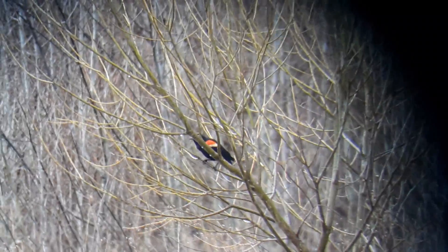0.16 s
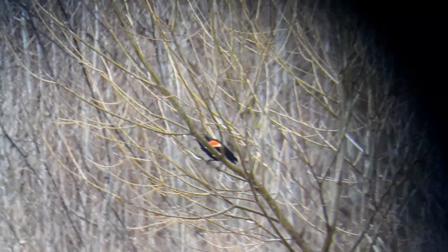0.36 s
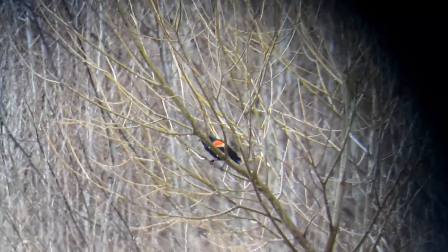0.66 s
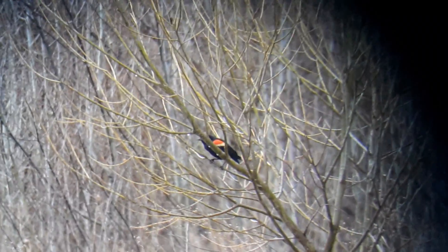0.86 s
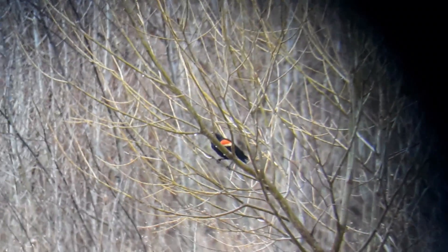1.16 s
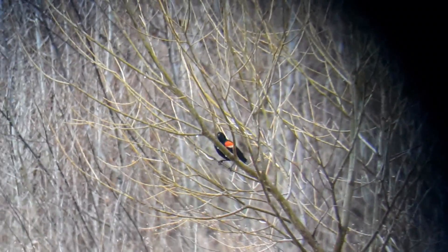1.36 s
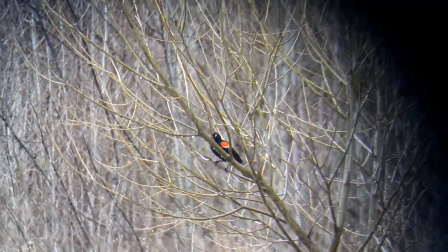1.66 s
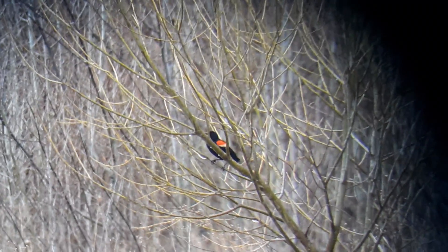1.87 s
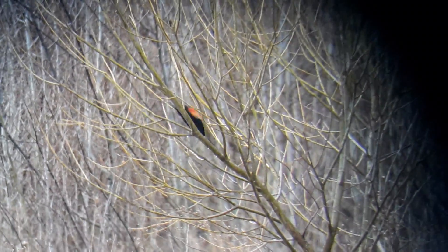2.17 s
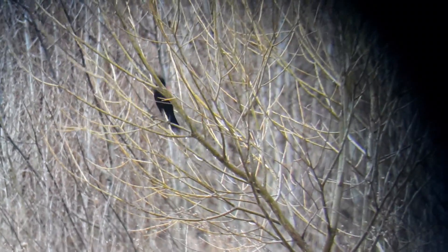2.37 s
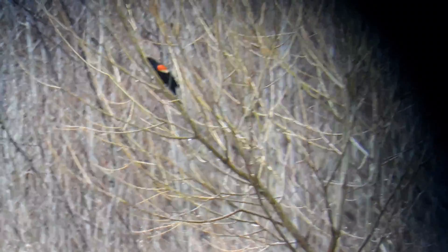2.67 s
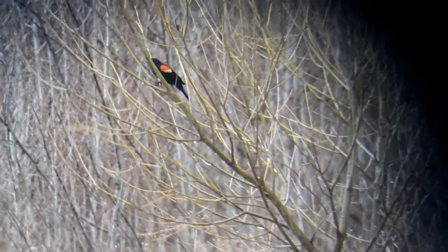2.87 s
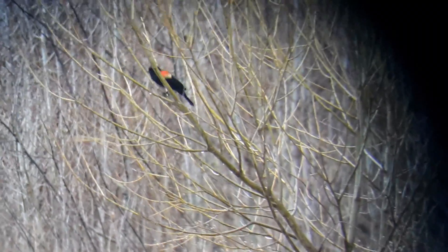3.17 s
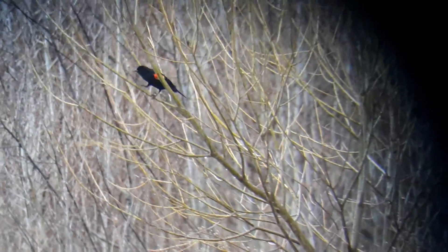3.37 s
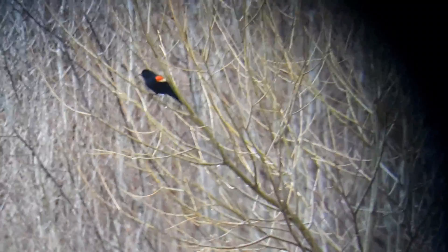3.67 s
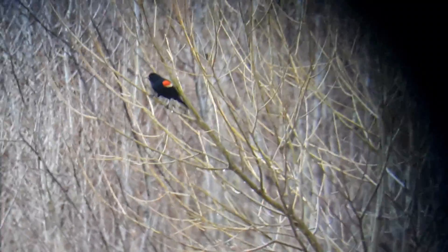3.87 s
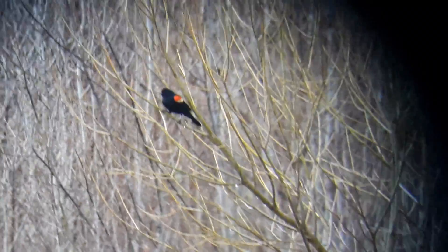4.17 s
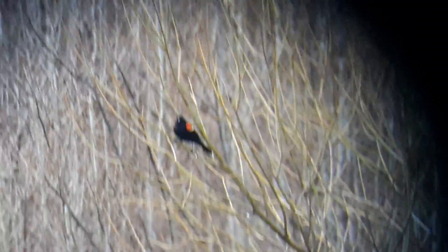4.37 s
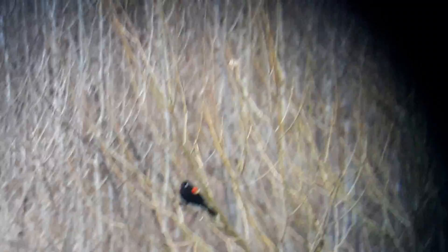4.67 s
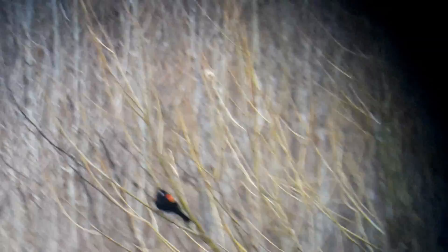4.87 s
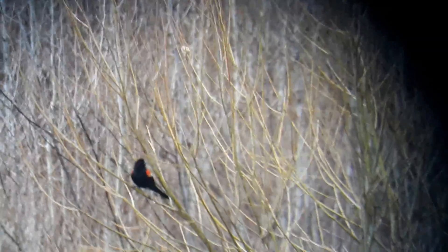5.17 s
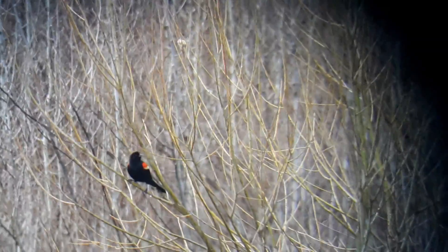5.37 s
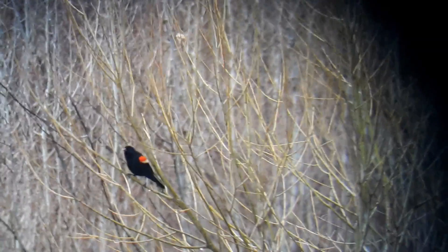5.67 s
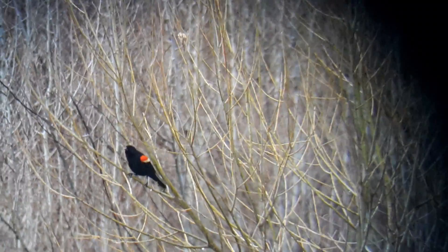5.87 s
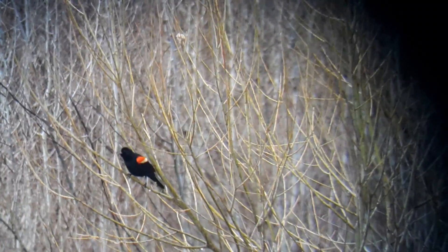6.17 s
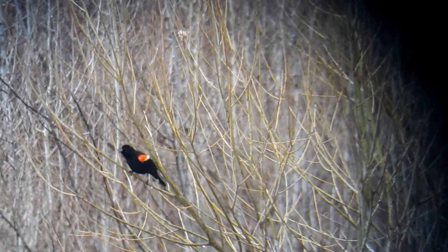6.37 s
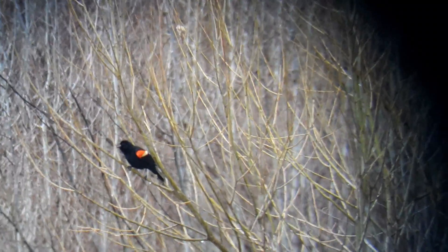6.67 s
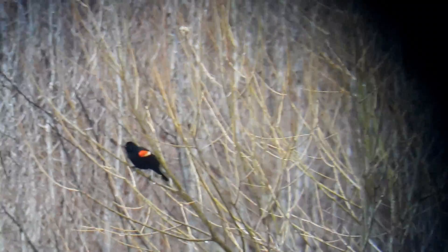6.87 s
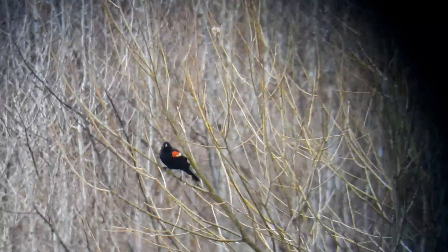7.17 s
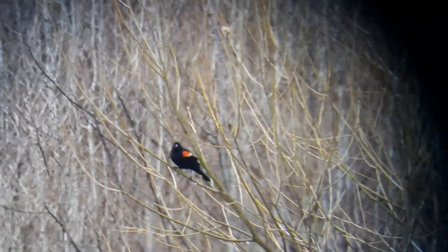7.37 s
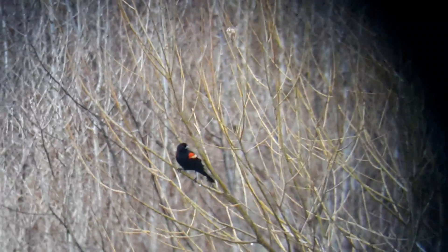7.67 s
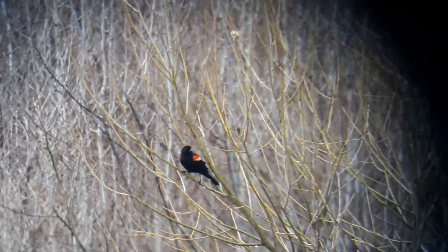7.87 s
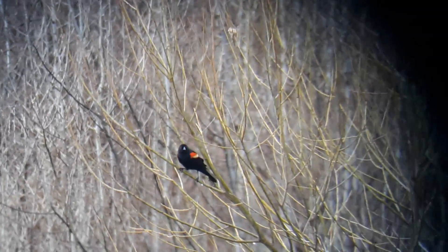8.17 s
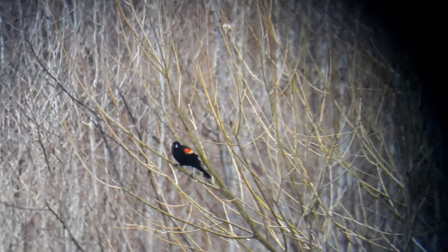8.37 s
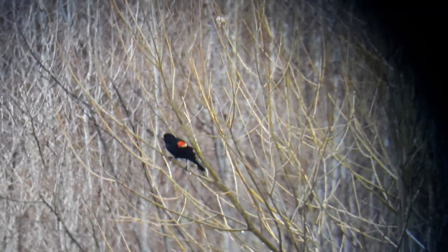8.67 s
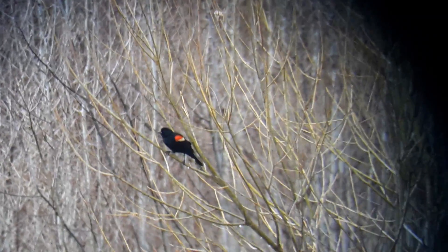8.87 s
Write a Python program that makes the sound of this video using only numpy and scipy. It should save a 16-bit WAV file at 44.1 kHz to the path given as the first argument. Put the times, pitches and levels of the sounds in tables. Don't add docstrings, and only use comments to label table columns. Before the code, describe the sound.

A continuous shrill whine of many peeping frogs, wavering slightly, fills the whole nine seconds over faint low traffic and hiss. At 0.2-0.7 s swallows twitter rapidly, with a small chack; at 0.85 s a sparrow whirrs, then ticks about every 0.13 s until 1.75. Faint whistles, a chack and reedy notes come around 1.7-2.6, then a weak fast trill to 3.1. Twitters and a sharp double chack at 3-3.2 lead to thin piping and single chacks. A strong dull knock lands at 3.67. From 4.2 to 5.05 a blackbird on the right sings: short burr, buzz, then slow harsh trill, with a bump at 4.48. Twitters at 5.2, knock at 5.45. Sparrow ticks return at 6.1-6.75 alongside clear whistles at 6.3-6.5; a faint distant trill and several rattly bumps near 6.9. At 7.45 a sharp whistle starts a quick trill until 8.0. Thin pipes and a weak chuck close.

```python
import sys
import numpy as np
from scipy import signal
from scipy.fft import rfft, irfft
from scipy.io import wavfile
from scipy.ndimage import uniform_filter1d

SR = 44100
rng = np.random.default_rng(int(sys.argv[2]) if len(sys.argv) > 2 else 0)


def output_pcm(signal):
    pcm = np.clip(np.atleast_2d(signal).T, -1, 1) * 32767
    wavfile.write(sys.argv[1], SR, np.round(pcm).astype(np.int16))


def gain_from_decibels(decibels):
    exponent = np.asarray(decibels, float) / 20
    return 10 ** exponent


N = 397341

# time in seconds, level in dB.
FROG_LEVEL = [(0.0, -49), (0.2, -52), (1.93, -50), (2.31, -54), (2.43, -48), (2.81, -52.5), (4.99, -48.5),
              (5.37, -51.5), (7.93, -49), (8.63, -52.5), (9.01, -50)]
# time in seconds, level in dB.
FAR_SONG_LEVEL = [(0, -66.5), (.4, -74.5), (.85, -77.5), (1.1, -83), (1.9, -81.5), (2.4, -78), (2.7, -72),
                  (3.15, -71.5), (4.2, -75.5), (4.6, -62.5), (5.05, -65), (5.4, -74.5), (6.3, -76.5),
                  (6.7, -63.5), (7.35, -80), (7.6, -67.5), (8.05, -68.5), (9.01, -82)]
# time in seconds, gain in dB.
CAMERA_GAIN = [(0, 2.5), (4.29, 0.5), (4.89, 4.5), (5.87, -0.5), (6.95, 6), (7.4, 2.5), (7.98, 4),
               (8.21, 0.5), (9.01, 1)]
# frequency in Hz, level in dB per Hz.
TRAFFIC_SPECTRUM = [(12, -28.5), (28, -22.5), (52, -8.5), (91, -1), (157, -7), (204, -13), (672, -19.5),
                    (1110, -28), (1770, -32), (2080, -39.5), (2500, -16), (3250, -38.5), (5500, -120)]
SONG_HAZE_SPECTRUM = [(1910, -1.5), (3250, 9.5), (3880, 1), (4180, 1), (4330, -2), (4680, -4.5), (4880, -3),
                      (5090, 3), (5230, -4.5), (5960, -24.5), (6980, -18), (7420, -56.5), (8000, -56.5),
                      (10400, -50.5), (17600, -120)]
HISS_SPECTRUM = [(3530, -38), (6000, -8.5), (6290, -10), (6890, -16.5), (8920, -11), (10700, -1),
                 (14000, 2), (15500, -1.5)]
# frequency in Hz, left minus right in dB.
SHADE = [(60, -1), (110, -1.0), (200, 0.0), (380, -3.5), (700, -2.5), (1290, -2), (2380, -1.5), (4400, -13),
         (8120, 1), (15000, 0)]
# frequency in Hz, likeness from 0 to 1.
LIKENESS = [(30, .4), (60, .8), (130, 0.6), (290, 0.42), (640, .3), (1410, .3), (3100, .3), (6820, 0)]

# start in seconds, length in seconds, centre in Hz, pitch swing in Hz, level in dB.
PURRS = [
    (.05, 0.78975, 5110, 109.5, -78),
    (6.05, 0.67, 5189, 117, -77.5),
    (8.05, 0.61, 4909, 180, -75),
]
RATTLES = [(1.91, 0.075, 4057, 301, -71.5), (4.44, 0.6915, 6607, 200.9, -79.5),
           (4.52, 0.5195, 3662, 346.7, -60.5), (4.5, 0.602, 2375, 119, -69), (6.62, 0.3653, 4624, 309, -74),
           (7.44, 0.04787, 2200, 300, -56.5), (7.472, 0.0565, 4926, 180, -58.5),
           (7.48, .05, 4050, 200.3, -66), (7.5, 0.4485, 6581, 299.2, -88.5),
           (7.53, 0.4826, 2314, 152.1, -71)]
HUSKS = [
    (2.61, .5, 4952, 131, -72.5),
    (2.61, .61, 3729, 300, -70),
    (7.52, .485, 3651, 305.7, -58),
    (7.54, .45, 5021, 199.5, -69.5),
]
BUZZES = [
    (4.285, 0.148, 5055, 160, -49.5),
    (4.3, 0.13, 4200, 200, -61),
    (4.295, 0.15, 3400, 120, -58),
    (4.3, .13, 6720, 150, -76),
]
BURRS = [
    (4.285, 0.17866, 1515, 52, -68.5),
    (4.196, 0.05576, 2210, 165, -45.5),
    (4.2, 0.07132, 6700, 280, -76),
]
WHIRR = [
    (.84, 0.08794, 6740, 403.1, -56.5),
]

# start in seconds, length in seconds, foot in Hz, top in Hz, level in dB.
TWITTERS = [(.178, 0.0125, 4791, 5298, -63.5), (0.197, 0.01377, 4788, 5257, -56.5),
            (.216, 0.01491, 4612, 5847, -62), (0.234, 0.01716, 4479, 5360, -60.5),
            (0.251, 0.01704, 4364, 5866, -57.5), (0.276, 0.00712, 4697, 5275, -64),
            (0.286, 0.008095, 4898, 5285, -65.5), (.296, 0.00806, 4803, 5411, -63),
            (0.583, 0.0204, 4316, 5722, -63), (0.608, 0.01513, 4393, 5804, -60),
            (0.627, 0.02025, 4494, 5689, -67), (0.646, 0.01656, 3907, 5624, -55.5),
            (.67, 0.01539, 4703, 5210, -66), (0.687, 0.01788, 4525, 5100, -59.5),
            (0.725, 0.00775, 4474, 5383, -66.5), (2.939, 0.01657, 4239, 5401, -62),
            (2.961, 0.00964, 4314, 5189, -58.5), (2.987, 0.01236, 4642, 5317, -61),
            (3.002, 0.0129, 4506, 5254, -60), (3.027, 0.01214, 4632, 5344, -63),
            (3.05, 0.01114, 4760, 5344, -68.5), (5.209, .013, 4421, 5863, -58),
            (5.225, 0.02, 4383, 5610, -58.5), (5.238, 0.019305, 3992, 5425, -54),
            (5.261, 0.01752, 4531, 5264, -62), (5.289, 0.00889, 4715, 5510, -63),
            (5.305, 0.01559, 4613, 5499, -67), (5.328, 0.01007, 4940, 5278, -70.5),
            (5.667, 0.01314, 4900, 5401, -73), (5.679, .017, 4500, 5392, -64.5),
            (5.707, 0.01453, 4606, 5298, -65.5), (5.724, 0.0169, 4691, 5100, -68.5)]
# start in seconds, length in seconds, foot in Hz, top in Hz, level in dB.
ARCHES = [
    (0.308, 0.03486, 4388, 4672, -64),
    (3.185, 0.031, 1104, 1573, -73.5),
    (3.191, .025, 4237, 4989, -57.5),
    (7.456, 0.01673, 6304, 6592, -74),
]
COO = (3.84, .21, 1165, 1222, -69)
# start in seconds, peak level in dB, upper edge of the throat band in Hz.
CHACKS = [(0.3197, -52.5, 5000), (2.357, -58.5, 3800), (3.191, -51.5, 4723), (3.2, -53, 4843),
          (3.194, -66.5, 6500), (3.21, -57, 4000), (3.64, -57, 3890), (3.8813, -56, 3820),
          (4.06, -57, 3800), (4.4087, -59.5, 6791), (5.64, -55, 4000), (5.9923, -72, 3660),
          (6.485, -58.5, 3800)]
# start in seconds, length in seconds, start in Hz, end in Hz, level in dB.
SEEPS = [(0.569, 0.01517, 5531, 6128, -75.5), (2.005, 0.1009, 6596, 5664, -77),
         (2.15, 0.06963, 6585, 5471, -81), (2.188, 0.1121, 5734, 5398, -79.5),
         (2.861, 0.02705, 5946, 5628, -74.5), (4.27, 0.3163, 7459, 7692, -85),
         (4.694, .11, 7511, 7435, -82.5), (8.207, 0.0399, 6989, 6900, -84.5),
         (8.566, 0.0278, 6800, 7170, -90.5), (8.882, 0.05456, 7078, 7175, -88)]
WHISTLES = [(1.715, 0.1199, 1930, 1982, -71.5), (1.813, 0.0464, 1811, 1972, -71.5),
            (3.146, 0.06524, 1470, 1560, -71), (5.913, 0.0541, 2260, 2312, -65.5),
            (3.229, 0.15004, 4890, 5100, -74), (2.47, 0.0037, 5584, 3750, -64.5),
            (3.443, 0.039, 4460, 4440, -74.5), (3.489, 0.034, 4810, 5050, -72.5),
            (6.492, 0.05376, 5851, 5798, -77.5), (7.272, 0.1066, 6191, 6342, -73.5),
            (4.488, 0.02334, 3334, 3524, -57), (6.298, 0.01738, 1193, 1106, -65.5),
            (6.3, 0.0741, 2384, 2446, -48.5), (6.305, 0.065, 2191, 2171, -56),
            (6.393, 0.14637, 2077, 2155, -54), (6.523, 0.01998, 2373, 1987, -54),
            (6.399, 0.0694, 6395, 6232, -82.5), (2.683, .03, 1418, 1448, -73.5),
            (6.539, 0.03309, 1554, 1220, -60.5), (6.604, 0.00487, 5546, 3830, -55),
            (6.617, 0.02637, 4884, 5410, -68), (6.889, 0.00598, 2331, 1300, -56),
            (7.42, 0.03693, 1160, 1148, -82), (7.453, 0.02132, 2426, 2101, -45),
            (7.66, 0.07587, 1467, 1628, -65), (8.006, 0.02818, 4973, 5125, -64)]
# start in seconds, peak level in dB.
TICKS = [(0.961, -47.5), (1.0865, -53.5), (1.2157, -53.5), (1.3409, -54.5), (1.473, -54.5), (1.6067, -53.5),
         (1.741, -55.5), (6.0891, -68), (6.213, -58), (6.3455, -56.5), (6.4844, -57.5), (6.6184, -58),
         (6.759, -69)]
# start in seconds, second overtone in dB, third overtone in dB.
CHUCKS = [
    (2.349, -71, -75),
    (4.05, -64, -74),
    (6.473, -60.5, -74.5),
    (8.705, -69.5, -80),
]
# start in seconds, length in seconds, start in Hz, end in Hz.
REEDY = [(2.484, 0.11772, 1641, 1705), (2.495, 0.0816, 1168, 1219), (4.451, 0.02189, 1985, 1802),
         (7.18, 0.0824, 1460, 1660), (7.258, 0.10782, 1656, 1696), (7.48, 0.02711, 2431, 2537)]
# first, second, third and fourth partial in dB.
REEDY_PARTIALS = [(-88, -59.5, -69.5, -98.5), (-85.5, -84, -68, -73.5), (-54, -83, -70, -93.5),
                  (-54, -80.5, -91.5, -87), (-68.5, -64, -61.5, -66), (-48, -59.5, -95.5, -99)]
# start in seconds, start in Hz, end in Hz, level in dB.
LOW_PIPER = [(3.275, 4454, 4360, -69.5), (3.664, 4492, 4383, -62.5), (4.085, 4571, 4345, -60),
             (8.09, 4584, 4494, -68.5), (8.455, 4530, 4388, -66), (8.758, 4355, 4407, -64)]
HIGH_PIPER = [(3.769, 4620, 4600, -63), (4.143, 4630, 4600, -60), (8.53, 4680, 4590, -71),
              (8.95, 4540, 4600, -65)]

# time in seconds, pulses a second, level in dB.
FAINT_TRILL = [(2.61, 174, -72), (2.7, 170.5, -70), (2.85, 166.5, -70), (3.11, 162.5, -71)]
NEAR_TRILL = [(4.49, 52.5, -53), (4.65, 50, -51.5), (4.74, 48, -50.5), (4.85, 47.2, -50.5),
              (4.93, 49.2, -51), (5.06, 48, -56)]
FAR_TRILL = [(6.59, 50.5, -72), (6.75, 48.8, -69), (6.86, 47.5, -67), (6.95, 48.6, -67), (7.108, 48.8, -68),
             (7.12, 49, -80)]
QUICK_TRILL = [(7.528, 91, -63), (7.68, 91.3, -61), (7.87, 88.8, -60), (7.997, 85, -61)]
# place in the pulse from 0 to 1, pitch in Hz, level in dB.
FAINT_LOW = [(.2, 3590, 2.5), (.7, 4005, -5.5)]
FAINT_HIGH = [(0, 4950, 10), (.5, 4756, -1.5)]
NEAR_PULSE = [(0, 5650, 12), (.08, 4820, 18.5), (.14, 3550, 6), (.21, 4900, 14), (.3, 5150, 9),
              (.4, 4950, 7.5), (.55, 4200, 4), (.72, 3850, 4), (.87, 4550, 8), (.94, 5100, 14)]
FAR_PULSE = [(0, 3458, 16.71), (.15, 3380, 9), (.3, 4200, 2), (.5, 4969, 3.7), (.7, 4400, 3),
             (.85, 3515, 5.7)]
QUICK_LOW = [(0, 3700, 10), (.1, 4050, 13), (.25, 3850, 11), (.4, 3300, 5), (.55, 4300, 11),
             (.65, 3850, 17.5), (.75, 3250, 12), (.88, 3300, 10)]
QUICK_HIGH = [(0, 5050, 10), (.25, 4500, 1), (.5, 5050, 6), (.73, 4400, 0)]

# start in seconds, peak level in dB, time to ring down 60 dB in seconds, brightness in dB.
BUMPS = [(3.118, -43.5, 0.0634, -23.5), (3.667, -22, 0.16635, -21.5), (4.48, -35, 0.099, -32),
         (5.452, -35, 0.07014, -29.5), (6.857, -44.5, 0.1076, -8), (6.872, -50, 0.2961, 7),
         (6.913, -43.5, 0.0788, -7), (6.929, -35, 0.08846, -12.5), (6.949, -49, 0.2353, -1)]
# frequency in Hz, level in dB, share of the ring time.
BODY = [(107.63, -13, 3.615), (138.17, 8, 0.6463), (176.13, 2.5, 0.4311), (235.9, 0.5, 0.599),
        (353.02, -9.5, 0.4163), (560.82, 2.5, 0.7724), (863.3, -12.5, 0.29)]

POND_LEAD = 17


def level(x, db):
    return x * gain_from_decibels(db) / np.sqrt(np.mean(x ** 2))


def curve(table):
    s, *columns = np.transpose(table)
    return [np.interp(np.arange(N) / SR, s, c) for c in columns]


def walk(rate):
    k = int(SR / rate)
    steps = np.repeat(rng.standard_normal(N // k + 1), k)
    return 1.2 * uniform_filter1d(uniform_filter1d(steps, k), k)[:N]


def shaded(hz):
    return -23 * min(hz / 3508, 1) ** 2


def add(out, s, wave, left_db):
    i = int(s * SR)
    wave = wave[..., :out.shape[1] - i]
    out[:, i:i + wave.shape[-1]] += wave * np.array([[gain_from_decibels(left_db)], [1]])


def note(length, hz, db, edge=.25, rough=.003):
    u = np.arange(int(length * SR)) / (length * SR)
    knots = rng.standard_normal((2, int(300 * length) + 3))
    sway, flicker = (np.interp(u, np.linspace(0, 1, len(k)), k) for k in knots)
    fade = np.sin(np.pi / 2 * np.clip(np.minimum(u, 1 - u) / edge, 0, 1))
    turn = 2 * np.pi * np.cumsum(hz(u) * (1 + rough * sway)) / SR
    return np.sqrt(2) * gain_from_decibels(db + 200 * rough * flicker) * fade * np.sin(turn)


def slur(out, s, length, start, end, db, left_db):
    add(out, s, note(length, lambda u: end + (start - end) * (1 - u) ** 1.5, db + 1), left_db)


def arch(out, s, length, foot, top, db, rough=.022):
    wave = note(length, lambda u: foot + (top - foot) * np.sin(np.pi * u), db + 2.5, rough=rough)
    add(out, s, wave, shaded(foot))


def reeds(x, t60):
    t = np.arange(int(.5 * SR)) / SR
    tail = rng.standard_normal((2, len(t))) * gain_from_decibels(-60 * t / t60)
    return signal.fftconvolve(x, tail / np.sqrt(np.sum(tail[0] ** 2)), axes=1)[:, :x.shape[1]]


def air(spectrum, shade=0.86):
    log_hz = np.log(np.arange(N // 2 + 1) * SR / N + 1)

    def read(table, **ends):
        hz, value = np.transpose(table)
        return np.interp(log_hz, np.log(hz), value, **ends)

    alike = np.clip(read(LIKENESS), -.95, .95)
    mid, side = rfft(rng.standard_normal((2, N)))
    pair = np.sqrt(1 + alike) * mid + np.sqrt(1 - alike) * side * np.array([[1], [-1]])
    tilt = shade * read(SHADE) * np.array([[.5], [-.5]])
    pair = irfft(pair * gain_from_decibels(read(spectrum, left=-150, right=-150) + tilt), N)
    pair[0] = np.roll(pair[0], -POND_LEAD)
    return pair / np.std(pair.mean(axis=0))


def traffic():
    return air(TRAFFIC_SPECTRUM) * gain_from_decibels(-60 + 0.83 * walk(1.7492) + 0.9719 * curve(CAMERA_GAIN)[0])


def far_songs():
    return air(SONG_HAZE_SPECTRUM, shade=0.8) * gain_from_decibels(curve(FAR_SONG_LEVEL)[0] + 1.6 * walk(13))


def frogs(count=140):
    out = np.zeros((2, N + SR))
    for pitch, size, place, pace in rng.standard_normal((count, 4)):
        hz = 2790 + 255 * np.tanh(.45 * pitch)
        peep = note(.12, lambda u: hz + 300 * (u - .6), 3.554 * size, edge=0.2058, rough=0.0026942)
        peep = np.pad(peep * np.linspace(.3, 1, len(peep)), 40)
        pair = np.array([np.roll(peep, round(1.4 * place - POND_LEAD)), peep])
        gaps = 1 + .1 * pace + .08 * rng.standard_normal(size=16)
        for s in np.cumsum(gaps) - gaps[0] * rng.random():
            if s < N / SR + 1:
                add(out, s, pair, -8.3 + 2.3 * place)
    out[0] = irfft(-1j * rfft(out[0]), out.shape[1])
    out = (out + gain_from_decibels(-3.5) * reeds(out, .3))[:, SR:]
    now = np.sqrt(uniform_filter1d(out.mean(axis=0) ** 2, SR // 3))
    return out / now * gain_from_decibels(curve(FROG_LEVEL)[0])


def buzzes(table, rate, rough):
    out, wobble = np.zeros((2, N)), walk(600)
    for s, length, hz, swing, db in table:
        turn = 2 * np.pi * rate * np.arange(int(length * SR)) / SR
        shake = rough * wobble[int(s * SR):][:len(turn)]
        path = hz + swing * (shake - np.cos(turn + 0.43))
        voice = note(length, lambda u: path, db, edge=0.043 / length, rough=0.0037)
        add(out, s, voice * (1 + 0.53 * np.cos(turn)), shaded(hz))
    return out


def swallows():
    out = np.zeros((2, N))
    throat_hz, throat_width_hz = 5100, 220
    for s, length, foot, top, db in TWITTERS:
        stroke = note(length, lambda u: foot + (top - foot) * u, db, edge=0.18)
        off = (np.linspace(foot, top, len(stroke)) - throat_hz) / throat_width_hz
        add(out, s, stroke / np.sqrt(1 + off ** 2), -14)
    return out


def arched_calls():
    out = np.zeros((2, N))
    for row in ARCHES:
        arch(out, *row)
    arch(out, *COO, rough=.003)
    return out


def chacks():
    out, t = np.zeros((2, N)), np.arange(int(.04 * SR)) / SR
    for s, db, hz in CHACKS:
        passband = signal.butter(2, [hz * .75, hz * 0.9956], "band", fs=SR, output="sos")
        burst = level(signal.sosfilt(passband, rng.standard_normal(len(t))), db - 0.5)
        add(out, s, burst * np.minimum(t / 0.0065, 1) * np.exp(-t / 0.0078), -15)
    return out


def seeps():
    out = np.zeros((2, N))
    for row in SEEPS:
        slur(out, *row, left_db=-16.5)
    return out


def sparrow():
    out = np.zeros((2, N))
    for s, db in TICKS:
        for lag, hz, sweep in ((0, 7404, -1600), (.0035, 5389, 2392.5)):
            tick = note(0.002502, lambda u: hz + sweep * u, db - 4.5, edge=0.8839)
            add(out, s + lag - .001, tick, -12)
        slur_db = -69.5 if s < 2 else -75.5
        length, fall_db = .028 + .014 * rng.random(), slur_db - 1 + 2.5 * rng.standard_normal()
        fall = note(length, lambda u: 4150 + 800 * (.7 - u) ** 2, fall_db, rough=.012)
        add(out, s + .043, fall, -9)
        add(out, s + 0.078, note(0.018, lambda u: 3450 + 500 * u, slur_db - 5.5), -14)
    return out


def whistles():
    out = np.zeros((2, N))
    for s, length, start, end, db in WHISTLES:
        slur(out, s, length, start, end, db, shaded(start))
    return out


def chucks():
    out = np.zeros((2, N))
    for s, *levels in CHUCKS:
        for k, db in enumerate(levels, start=2):
            arch(out, s, .044, k * 1530, k * 1830, db, rough=.03)
    return out


def reedy_notes():
    out = np.zeros((2, N))
    for (s, length, start, end), partials in zip(REEDY, REEDY_PARTIALS):
        for k, db in enumerate(partials, start=1):
            slur(out, s, length, k * start, k * end, db, shaded(k * start))
    return out


def trill(table, pulse, peak_s, left_db, edge_s=0.032):
    rate, db = curve(table)
    t = np.arange(N) / SR
    on = np.clip(np.minimum(t - table[0][0], table[-1][0] - t) / edge_s, 0, 1)
    count = np.cumsum(rate) / SR
    count = count - count[int(peak_s * SR)]
    place, hz, pulse_db = np.transpose(pulse)

    def read(column):
        return uniform_filter1d(np.interp(count, place, column, period=1), size=24)

    strength = gain_from_decibels(read(pulse_db) + 1.5 * walk(300) + .7 * walk(45))
    pitch = read(hz) + 80 * walk(500)
    wave = strength * np.sin(2 * np.pi * np.cumsum(pitch) / SR)
    passband = signal.butter(10, 5850, fs=SR, output="sos")
    return signal.sosfilt(passband, wave) * on * gain_from_decibels(db + np.array([[left_db], [0]]))


def pipers():
    out = np.zeros((2, N))
    for table, length, left_db in ((LOW_PIPER, 0.0926, -20.5), (HIGH_PIPER, 0.071, -8)):
        for s, start, end, db in table:
            slur(out, s, length, start, end, db, left_db)
    return out


def bumps():
    out, t = np.zeros((2, N)), np.arange(int(.3 * SR)) / SR
    push = np.sin(np.pi / 2 * np.minimum(t / 0.0044174, 1)) ** 2
    glide, glide_s = 0.9404, 0.0034154
    bent = t + glide * glide_s * (1 - np.exp(-t / glide_s))
    for s, db, t60, bright_db in BUMPS:
        ring = np.zeros(len(t))
        for hz, mode_db, share in BODY:
            decay = gain_from_decibels(mode_db + bright_db * (hz > 450) - 60 * t / (t60 * share))
            ring += decay * np.sin(2 * np.pi * hz * bent)
        add(out, s, gain_from_decibels(db - 28.5) * push * ring, 26)
    high = signal.butter(2, 80, "high", fs=SR, output="sos")
    return signal.sosfilt(high, out)


def scene():
    birds = buzzes(PURRS, 60, .4) + buzzes(RATTLES, 190, .4) + buzzes(HUSKS, 175, 1.2)
    birds += buzzes(BUZZES, 188, .12) + buzzes(BURRS, 75, .12) + buzzes(WHIRR, 280, .25)
    birds += swallows() + arched_calls() + chacks() + seeps()
    birds += whistles() + chucks() + reedy_notes() + pipers()
    for voice in (FAINT_LOW, FAINT_HIGH):
        birds += trill(FAINT_TRILL, voice, 2.8096, -20)
    birds += trill(NEAR_TRILL, NEAR_PULSE, 4.6204, -25)
    birds += trill(FAR_TRILL, FAR_PULSE, 6.9657, -16)
    for voice in (QUICK_LOW, QUICK_HIGH):
        birds += trill(QUICK_TRILL, voice, 7.5665, -24, edge_s=.012)
    birds[0] = np.roll(birds[0], 8)
    twigs = gain_from_decibels(-6.5) * reeds(birds, t60=.07)
    birds += sparrow()
    scatter = gain_from_decibels(-16) * reeds(birds, t60=0.63)
    return birds + scatter + twigs + frogs() + far_songs() + traffic() + bumps()


def roll_off(x):
    return signal.sosfilt(signal.butter(12, 15640, fs=SR, output="sos"), x)


def record(dry):
    hiss_db = curve(CAMERA_GAIN)[0] - 85 + 1.0 * walk(5) + .7 * walk(12)
    hiss = air(HISS_SPECTRUM, shade=.4) * gain_from_decibels(hiss_db)
    return roll_off(dry + hiss - .0005)


dry = scene()
out = record(dry)
output_pcm(out)
```